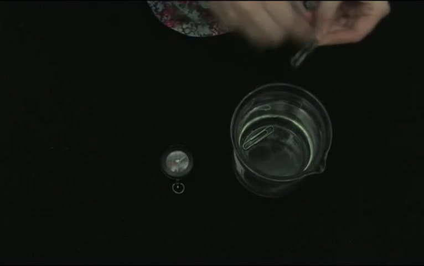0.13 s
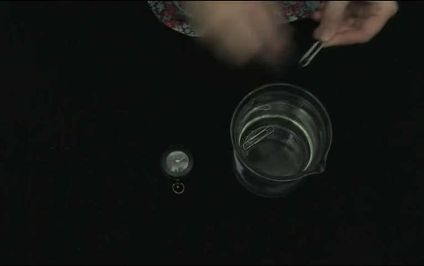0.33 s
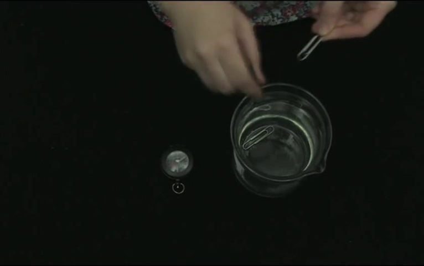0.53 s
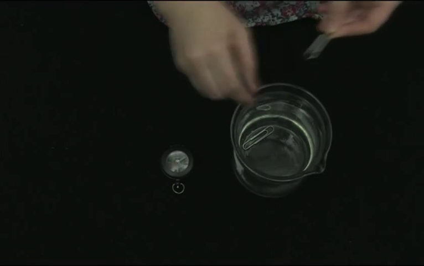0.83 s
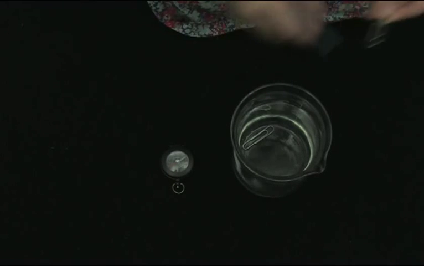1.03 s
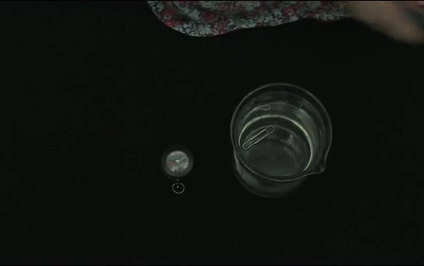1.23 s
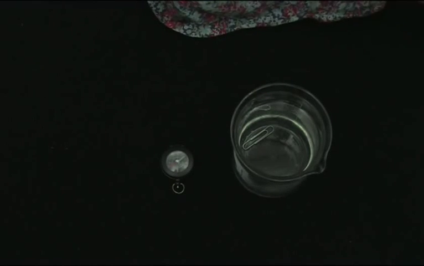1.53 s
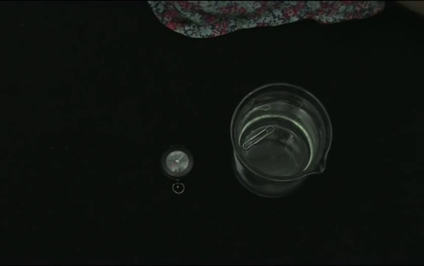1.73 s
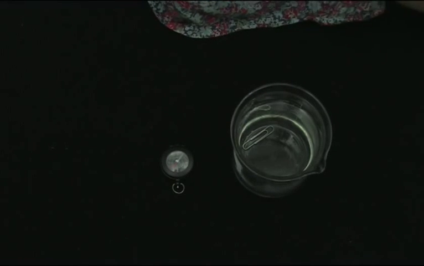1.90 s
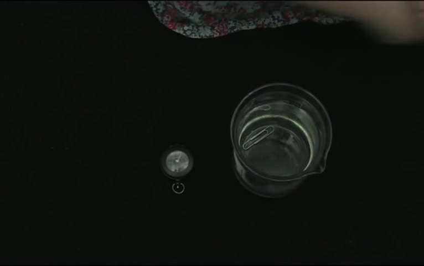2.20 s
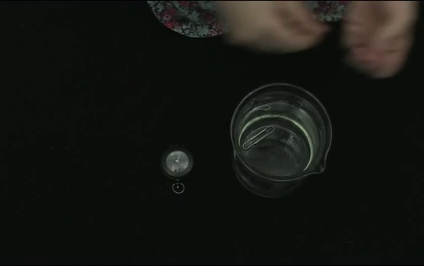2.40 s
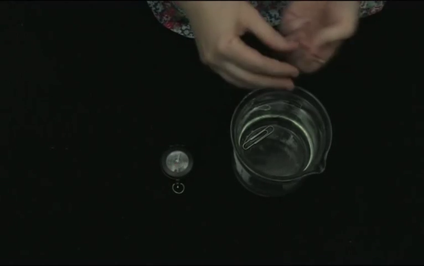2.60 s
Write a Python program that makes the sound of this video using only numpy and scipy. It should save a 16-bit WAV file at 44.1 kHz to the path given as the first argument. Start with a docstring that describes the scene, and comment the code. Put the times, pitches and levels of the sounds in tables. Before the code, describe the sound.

Rapid metallic clicks come from a paperclip snapping onto a magnet, scraping along and pinging off its end, three times over. After a brief lull, moving arms bring a soft cloth rustle and low bumps in a hushed room.

```python
"""A faint wire ring and light finger ticks open on the hush of a small room. Then a steel paperclip is
stroked three times along a hand-held magnet: it snaps on with a click, scrapes along with friction
making the wire sing, and slips off the end with a ping and a soft thud of the recoiling hands.
Then the arms move away and back: cloth rustles as its fibres catch and slip, with a few dull bumps."""
import sys
import numpy as np
from scipy import signal
from scipy.fft import rfft, irfft
from scipy.io import wavfile

SR = 44100
rng = np.random.default_rng(int(sys.argv[2]) if len(sys.argv) > 2 else 0)


def waveform_to_disk(signal):
    """Save audio, clipped to [-1, 1], as 16-bit WAV at the path in sys.argv[1]."""
    frames = np.transpose(np.atleast_2d(signal))
    scaled = np.clip(frames, -1, 1) * 32767
    samples = np.round(scaled).astype(np.int16)
    wavfile.write(sys.argv[1], SR, samples)


N = 121275
T = np.arange(N) / SR


def from_db(db):
    """Decibels to gain."""
    return 10 ** (np.asarray(db) / 20)


def rms_one(x):
    """Scale to unit rms."""
    return x / np.sqrt(np.mean(x ** 2) + 1e-20)


def fader(curve):
    """Gain ride through (t/s, level/dB) points."""
    return from_db(np.interp(T, *np.transpose(curve)))


def colour(x, spectrum):
    """EQ a noise through (f/Hz, level/dB) points; rms 1."""
    hz, db = np.transpose(spectrum)
    bins = np.maximum(np.fft.rfftfreq(N, 1 / SR), 1)
    eq = from_db(np.interp(np.log(bins), np.log(hz), db))
    return rms_one(irfft(rfft(x) * eq, N))


def decay(s, t60):
    """Envelope that jumps to 1 at time s and dies away."""
    return (T >= s) * np.exp(-np.log(1000) * np.clip((T - s) / t60, 0, 10))


def swell(s, length):
    """Envelope that rises and falls as half a sine."""
    return np.sin(np.pi * np.clip((T - s) / length, 0, 1))


def ring(s, hz, t60):
    """A damped sine that starts at time s."""
    return decay(s, t60) * np.sin(2 * np.pi * hz * (T - s))


def resonate(x, hz, width_hz):
    """Two-pole resonance with unity gain at its peak."""
    r = np.exp(-np.pi * width_hz / SR)
    feedback = [1, -2 * r * np.cos(2 * np.pi * hz / SR), r * r]
    return signal.lfilter(np.array([1, 0, -1]) * (1 - r * r) / 2, feedback, x + 1e-18)


def band(noise, hz, width_hz):
    """Noise through a resonance twice; rms 1."""
    return rms_one(resonate(resonate(noise, hz, width_hz), hz, width_hz))


def grains(per_s, spread_db):
    """Random tiny clicks of uneven size; rms 1."""
    sizes = from_db(spread_db * np.minimum(rng.exponential(1, N), 4)) * rng.choice([-1, 1], N)
    return rms_one(sizes * (rng.random(N) < per_s / SR))


def lumps(depth_db, per_s=70):
    """Gain that wanders as the cloth sticks and gives."""
    return from_db(depth_db * np.interp(T * per_s, np.arange(600), rng.standard_normal(600)))


# EQ of the room tone: f/Hz, relative level/dB
ROOM_TONE_EQ = [(20, -19), (60, 1), (120, 7.5), (300, -7), (600, -14), (1200, -19), (3000, -24),
                (6000, -23.5), (10000, -26)]
def room_tone():
    """The quiet room: a steady, bass-heavy bed of noise."""
    return from_db(-55) * colour(rng.standard_normal(N), ROOM_TONE_EQ)


# fader ride of the arm rumble: t/s, level/dB
RUMBLE_RIDE = [(0, -58), (0.5, -55.5), (0.75, -56), (0.92, -54.5), (1.05, -58.5), (1.25, -50), (1.44, -48),
               (1.53, -37), (1.58, -42), (1.72, -38), (1.91, -35.5), (1.96, -41), (2.08, -38.5),
               (2.12, -43), (2.22, -48.5), (2.31, -41), (2.42, -49), (2.54, -48), (2.62, -64),
               (2.75, -57.5)]
# its EQ: f/Hz, relative level/dB
RUMBLE_EQ = [(20, -25), (50, -9.5), (110, -1), (200, -3), (320, -8), (450, -13.5), (750, -21.5),
             (1200, -30), (4000, -45)]
def arm_rumble():
    """Moving arms make a low, lumpy rumble."""
    return fader(RUMBLE_RIDE) * rms_one(lumps(depth_db=2.5) * colour(rng.standard_normal(N), RUMBLE_EQ))


def wire_singing(hz=7970, width_hz=130):
    """The wire's main mode, kept ringing by friction, wavers in level and pitch; rms 1."""
    narrow = resonate(rng.standard_normal(N), hz, width_hz)
    tone = signal.hilbert(resonate(narrow, hz, 4 * width_hz))
    return rms_one(tone.real / np.sqrt(np.abs(tone) + 1e-12))  # 2:1 compression


# swells of the free wire: t/s, length/s, level/dB
FAINT_RINGS = [(-0.04, 0.061, -54.5), (1.05, 0.13, -69.5)]
def faint_rings(singing):
    """The free wire rings faintly between the fingers."""
    return singing * sum(from_db(db) * swell(s, length) for s, length, db in FAINT_RINGS)


# finger ticks: t/s, level/dB, f/Hz
TICKS = [(0.0060, -43, 900), (0.0230, -41.5, 1390), (0.3920, -45, 1910), (0.3936, -44, 2810)]
def finger_ticks():
    """Small dull ticks as the grip shifts."""
    noise = rng.standard_normal(N)
    return sum(from_db(db) * decay(s, t60=0.009) * band(noise, hz, width_hz=300) for s, db, hz in TICKS)


def soften(x, cutoff_hz=400):
    """A low-pass takes the edge off a knock."""
    return signal.sosfilt(signal.butter(2, cutoff_hz, fs=SR, output="sos"), x + 1e-18)


# bumps of hands and arms: t/s, level/dB, f/Hz
BUMPS = [(0.082, -39.5, 96), (0.243, -35, 161), (0.372, -32, 139), (0.655, -33.5, 140), (1.131, -29.5, 76),
         (1.304, -32, 143), (1.359, -33, 122), (1.408, -35, 147), (1.597, -30, 139), (1.718, -33.5, 140),
         (2.052, -23, 248), (2.134, -35, 161), (2.309, -38, 153), (2.38, -40, 193), (2.463, -30.5, 135)]
def hand_bumps():
    """Hands and arms bump as they move, each time a low, quickly damped tone."""
    return soften(sum(from_db(db) * ring(s, hz, t60=0.044) for s, db, hz in BUMPS))


# resonances of clip on magnet: f/Hz, width/Hz, level/dB
CONTACT_MODES = [(833, 350, -11.5), (2260, 480, -5), (3740, 370, -5.5), (4430, 1100, -7.5), (5720, 610, -5),
                 (5900, 300, -3), (7500, 1420, -3), (9620, 2000, -5)]
def contact(force, tilt_db):
    """Clip and magnet, pressed together, answer a force with broad resonances, tilted per octave."""
    return sum((-1) ** k * resonate(force, hz, width) * from_db(db + tilt_db * np.log2(hz / 6000))
               for k, (hz, width, db) in enumerate(CONTACT_MODES))


def click(s, db, tilt_db, makeup_db=11):
    """A sharp click in a short burst of noise that swells quickly and dies away."""
    rise = (T < s) * np.exp(np.clip((T - s) / 0.0007, -40, 0))
    burst = 0.15 * rng.standard_normal(N) * (rise + decay(s, t60=0.016))
    burst[int(s * SR)] += 1
    return from_db(db + makeup_db) * contact(burst, tilt_db)


def clink(s, hz):
    """A very short steel tone that gives a click its pitch."""
    return from_db(-30.5) * ring(s, hz, t60=0.0067)


# main and upper modes of the finger-damped wire: f/Hz, relative level/dB, t60/s
WIRE_MAIN = [(7900, 0, 0.017), (7900, -41, 0.077), (8000, -34, 0.015), (8100, -27, 0.02)]
WIRE_UPPER = [(8570, -11, 0.01), (9620, 2.5, 0.0065), (9900, -13, 0.008)]
def wire_ping(s, db, modes):
    """The wire is let go and rings in its modes."""
    attack = np.clip((T - s) / 0.0011, 0, 1)
    return from_db(db) * attack * sum(from_db(mode_db) * ring(s, hz, t60) for hz, mode_db, t60 in modes)


# ping level/dB, clink f/Hz
LANDINGS = [(0.205, -20.5, 1.5, 0.0047, -28, -28.5, 6330), (0.4805, -21.5, -0.5, 0.0022, -25, -28.5, 7030),
            (0.7630, -20.5, 0, 0.0013, -35.5, -44, 6150)]
def landings():
    out = np.zeros(N)
    for s, db, tilt, delay, bounce_db, ping_db, clink_hz in LANDINGS:
        out += click(s, db, tilt) + clink(s, clink_hz)
        out += click(s + delay, bounce_db, tilt) + wire_ping(s + delay, ping_db, WIRE_MAIN)
    return out


def recoil_thuds(landing_db=-36):
    """The hands recoil with a deep thud at each landing and slip-off."""
    jolts = [(s, landing_db) for s, *_ in LANDINGS] + [(s, thud_db) for s, *_, thud_db in SLIP_OFFS]
    return soften(sum(from_db(db) * ring(s, hz=46.2, t60=0.12) for s, db in jolts))


SLIDES = [(0.226, 0.2560, -41.5, -48.5), (0.501, 0.544, -43.5, -58), (0.779, 0.816, -40, -48)]
def slides(singing, rise_db=16):
    """Dragged along the magnet, the wire sings over a gritty scrape that builds to the end."""
    scrape = rms_one(contact(grains(per_s=1600, spread_db=2.5), tilt_db=0.5))
    out = np.zeros(N)
    for start, end, scrape_db, sing_db in SLIDES:
        along = np.clip((T - start) / (end - start), 0, 1)
        attack = np.clip((T - start) / 0.0032, 0, 1)
        gate = attack * ((T < end) + decay(end, t60=0.014))
        out += gate * (scrape * from_db(scrape_db - rise_db * (1 - along)) + singing * from_db(sing_db))
    return out


SNAGS = [(0.2305, -54, 9, -40), (0.2465, -34, 18, -38), (0.5230, -41, -8.5, -58),
         (0.7907, -25.5, -5.5, -37)]
def snags():
    """The wire catches mid-slide, clicks and rings."""
    return sum(click(s, db, tilt) + wire_ping(s, ping_db, WIRE_MAIN) for s, db, tilt, ping_db in SNAGS)


# clink f/Hz, thud level/dB
SLIP_OFFS = [(0.2551, -24.5, 2, -23.5, -7, 4730, -35.5), (0.5324, -21, 0, -13, -13, 4420, -29.5),
             (0.8098, -18.5, 1, -16, -3.5, 5020, -31.5)]
def slip_offs():
    """The wire springs off the magnet's end with a click and a bright ping."""
    out = np.zeros(N)
    for s, db, tilt, ping_db, upper_db, clink_hz, _ in SLIP_OFFS:
        out += click(s, db, tilt) + clink(s, clink_hz)
        out += wire_ping(s, ping_db, WIRE_MAIN) + wire_ping(s, ping_db + upper_db, WIRE_UPPER)
    return out


# soft swishes: t/s, length/s, level/dB, f/Hz, width/Hz
SWISHES = [(0.400, 0.100, -68.5, 4600, 380), (0.385, 0.110, -63, 1400, 1400),
           (1.140, 0.140, -64, 5400, 4000), (2.240, 0.090, -69, 5550, 590)]
def swishes():
    """Skin and sleeves brush in airy swells of noise."""
    noise = rng.standard_normal(N)
    return sum(from_db(db) * swell(s, length) * band(noise, hz, width)
               for s, length, db, hz, width in SWISHES)


# fader ride of the cloth rub: t/s, level/dB
RUB_RIDE = [(1.0, -77), (1.3, -78), (1.43, -62), (1.465, -53.5), (1.475, -43.5), (1.51, -57), (1.53, -44.5),
            (1.586, -53), (1.662, -43.5), (1.72, -41), (1.755, -43), (1.915, -42.5), (1.95, -50),
            (1.985, -40.5), (2.035, -57.5), (2.06, -46), (2.125, -61), (2.24, -64), (2.32, -63.5),
            (2.35, -60.5), (2.55, -65.5), (2.62, -68.5)]
# its EQ: f/Hz, relative level/dB
RUB_EQ = [(150, -24), (400, -0.5), (780, 3), (1020, -8.5), (1550, -1), (2200, -6.5), (2750, -3.5),
          (3400, -10.5), (6000, -19.5), (10000, -20.5)]
def cloth_rub(grain_share=0.56):
    """Fibres catch and slip, adding grain to a smooth rub."""
    fibres = np.sqrt(grain_share) * grains(per_s=1300, spread_db=5)
    smooth = np.sqrt(1 - grain_share) * rng.standard_normal(N)
    return fader(RUB_RIDE) * lumps(depth_db=0.2) * colour(fibres + smooth, RUB_EQ)


# fold flicks: t/s, level/dB
FOLDS = [(1.47, -52), (1.5220, -38.5), (1.716, -34), (1.7660, -39), (1.854, -55), (2.0290, -39),
         (2.0517, -31.5), (2.316, -40.5), (2.3250, -40), (2.3854, -46.5)]
# their EQ: f/Hz, relative level/dB
FOLD_EQ = [(150, 0), (400, 6), (800, 5), (1800, -3.5), (3400, -13), (6000, -20), (10000, -18)]
def fold_flicks():
    """Folds of cloth flick in short, dull puffs."""
    envelope = sum(from_db(db) * decay(s, t60=0.026) for s, db in FOLDS)
    return envelope * colour(rng.standard_normal(N), FOLD_EQ)


# thread crackles: t/s, level/dB
CRACKLES = [(1.763, -39.5), (1.8293, -34.5), (1.857, -38.5), (1.9290, -39.5), (2.0125, -39.5)]
# their EQ: f/Hz, relative level/dB
CRACKLE_EQ = [(1000, -12), (3500, 0), (7500, 0), (10000, -6)]
def thread_crackles():
    """Single threads snap free in tiny, bright bursts."""
    envelope = sum(from_db(db) * decay(s, t60=0.009) for s, db in CRACKLES)
    return envelope * colour(rng.standard_normal(N), CRACKLE_EQ)


def room_reverb(x, predelay_s=0.0065, wet_db=-18.5):
    """A short diffuse tail from the walls."""
    tail = rng.standard_normal(N) * decay(predelay_s, t60=0.1)
    return from_db(wet_db) * signal.fftconvolve(x, tail / np.linalg.norm(tail))[:N]


def scene():
    """Mono mix over room tone: clip and finger ticks feed the reverb, body and cloth stay dry."""
    singing = wire_singing()
    sharp = faint_rings(singing) + finger_ticks() + landings() + slides(singing) + snags() + slip_offs()
    body = arm_rumble() + hand_bumps() + recoil_thuds()
    cloth = swishes() + cloth_rub() + fold_flicks() + thread_crackles()
    return (room_tone() + sharp + room_reverb(sharp) + body + cloth)[None]


def record(dry):
    """A steep high cut on the whole mix."""
    cutoff_hz = 10330
    return signal.sosfilt(signal.ellip(10, .3, 70, cutoff_hz, fs=SR, output="sos"), dry)


dry = scene()
out = record(dry)
waveform_to_disk(out)
```